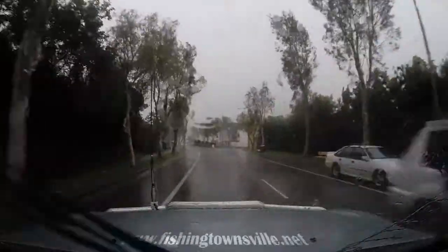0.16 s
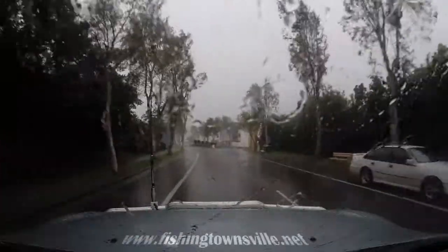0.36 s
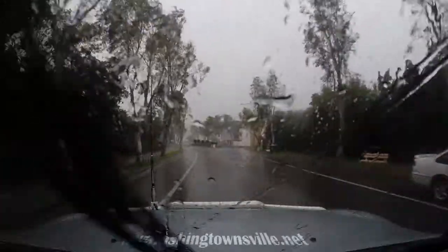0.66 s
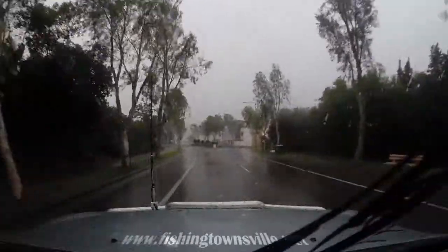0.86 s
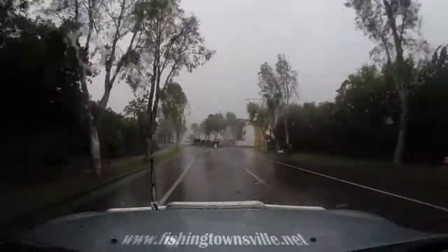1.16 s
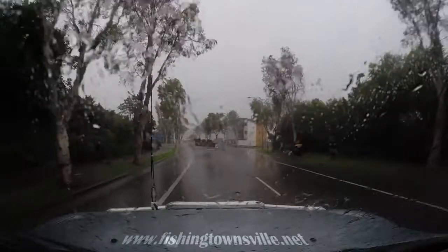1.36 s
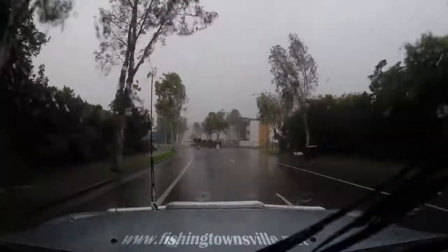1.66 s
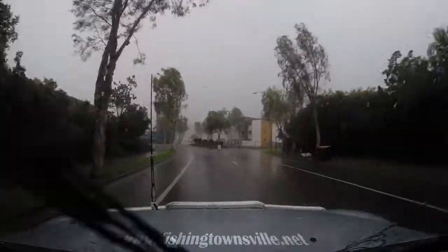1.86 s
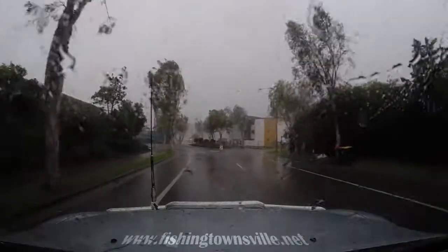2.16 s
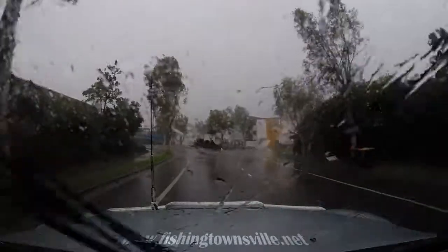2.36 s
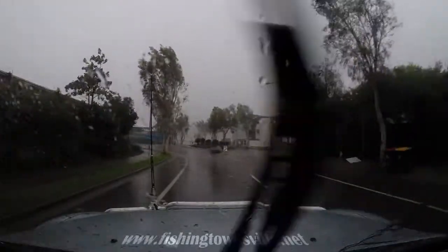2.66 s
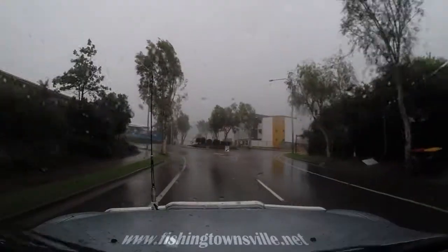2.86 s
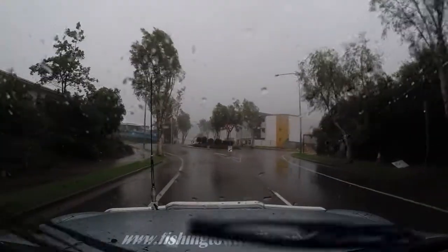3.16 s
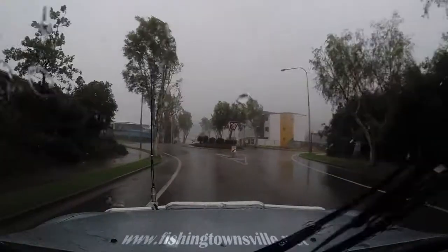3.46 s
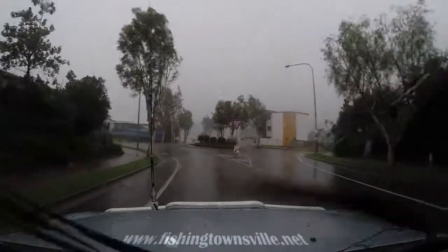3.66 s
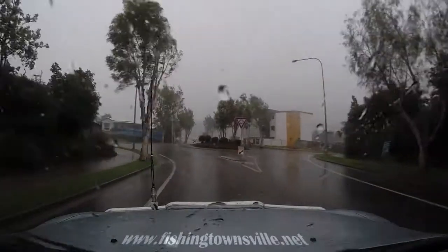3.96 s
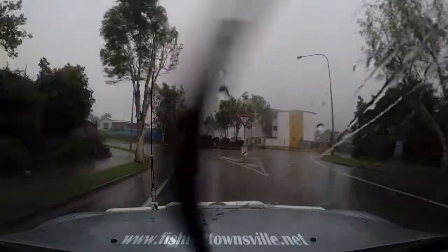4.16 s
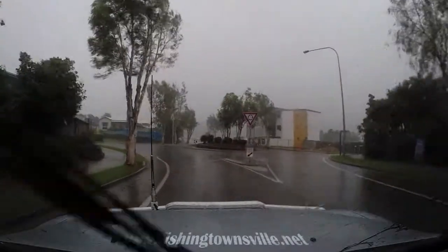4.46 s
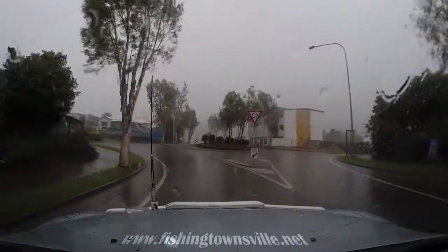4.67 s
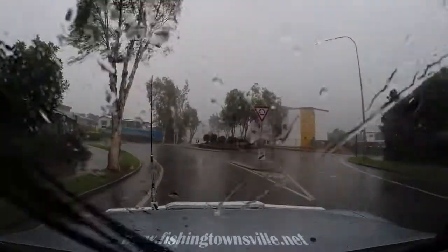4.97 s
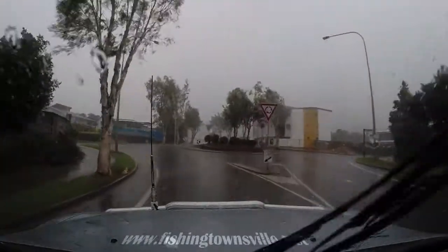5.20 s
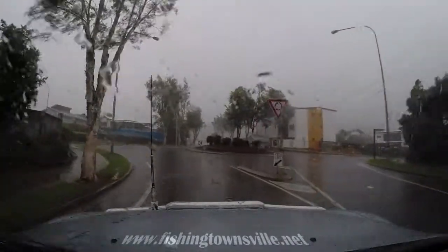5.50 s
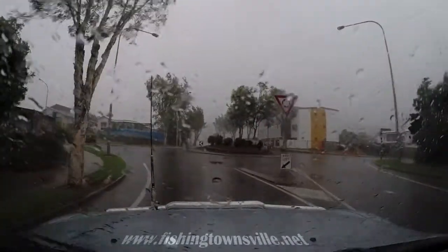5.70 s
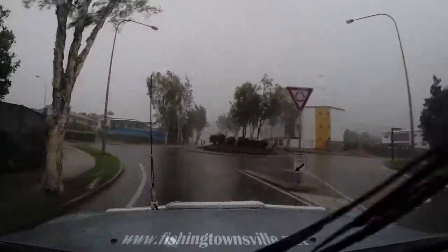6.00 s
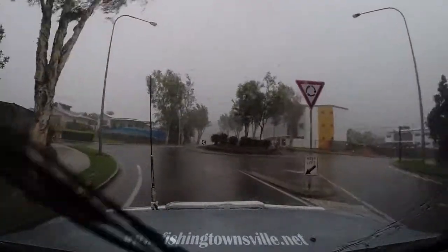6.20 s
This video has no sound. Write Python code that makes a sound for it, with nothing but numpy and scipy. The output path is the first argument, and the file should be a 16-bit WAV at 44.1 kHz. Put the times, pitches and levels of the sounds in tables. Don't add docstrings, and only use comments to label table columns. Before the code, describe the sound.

Inside a car slowing on a flooded street in a storm: heavy rain washing in gusts, drops cracking on glass, wipers thudding over low road rumble.

```python
import sys
import numpy as np
from scipy import signal
from scipy.fft import rfft, irfft
from scipy.io import wavfile
from scipy.ndimage import uniform_filter1d

SR = 44100
rng = np.random.default_rng(int(sys.argv[2]) if len(sys.argv) > 2 else 0)


def convert_level_to_amplitude(level_db):
    exponent = np.asarray(level_db, float) / 20
    return 10 ** exponent


def put_to_file(sound):
    columns = np.atleast_2d(sound).T
    safe = np.clip(columns, -1, 1)
    whole_steps = np.round(safe * 32767)
    wavfile.write(sys.argv[1], SR, whole_steps.astype(np.int16))


N = 279594

# (end of turn t/s, level/dB, boom level/dB, braking/s, settling/s)
WIPER_TURNS = [
    (0.107, -21, -19, 0.046, 0.02),
    (0.978, -21, -26, 0.051, 0.012),
    (1.849, -24.5, -24, 0.075, 0.017),
    (2.72, -20, -30, 0.049, 0.0084),
    (3.591, -24, -15.5, 0.053, 0.01),
    (4.449, -21.5, -19, 0.048, 0.009),
    (5.316, -21.5, -21, 0.036, 0.011),
    (6.177, -23.5, -19, 0.044, 0.015),
]


def rms_one(x):
    return x / np.sqrt(np.mean(x ** 2) + 1e-20)


def in_time(rows):
    s, *columns = np.transpose(rows)
    return [np.interp(np.arange(N) / SR, s, c) for c in columns]


def hump(at_s, length_s):
    return np.exp(-((np.arange(N) / SR - at_s) / length_s) ** 2)


def drift(rate):
    pole = np.exp(-40 * np.pi * rate / SR)
    chance = rng.standard_normal(N // 20 + 4002)
    slow = signal.lfilter([1], [1, -2 * pole, pole * pole], chance)[4000:]
    return np.interp(np.arange(N) / 20, np.arange(len(slow)), rms_one(slow))


def filtered(x, order, hz, kind="low"):
    return signal.sosfilt(signal.butter(order, hz, kind, fs=SR, output="sos"), x)


def smooth_low(x, hz):
    return signal.sosfiltfilt(signal.butter(2, hz, fs=SR, output="sos"), x)


def colour(x, spectrum):
    # (f/Hz, width/Hz, level/dB)
    resonances = [(40, 14, 6), (138, 5.3, -6), (210, 24, 3.5), (287.1, 17.4, 8.5), (428.6, 109, 11),
                  (622, 32, 8), (754, 19, 4), (1264, 43, 3.5)]
    hz = np.maximum(np.fft.rfftfreq(N, 1 / SR), 1)
    corner_hz, corner_db = np.transpose(spectrum)
    db = np.interp(np.log(hz), np.log(corner_hz), corner_db)
    for centre_hz, width_hz, top_db in resonances:
        db = db + top_db / (1 + (2 * (hz - centre_hz) / width_hz) ** 2)
    return irfft(rfft(x) * convert_level_to_amplitude(db), N)


def grains(per_s, spread_db):
    sizes = convert_level_to_amplitude(spread_db * np.minimum(rng.exponential(1, N), 4)) * rng.choice([-1, 1], N)
    return rms_one(sizes * (rng.random(N) < per_s / SR))


def flicker(x, low_hz, count, shared_db, own_db, rate):
    spectrum, hz = rfft(x), np.fft.rfftfreq(N, 1 / SR)
    together = drift(rate)
    octave = np.clip(np.log2(np.maximum(hz, 1) / low_hz), 0, count - 1)
    total = np.zeros(N)
    for k in range(count):
        band = irfft(spectrum * np.clip(1 - abs(octave - k), 0, 1), N)
        total += band * convert_level_to_amplitude(shared_db * together + own_db * drift(rate))
    return rms_one(total)


def place(out, at, sound):
    out[at:at + len(sound)] += sound[:N - at]


def buffeting():
    # (t/s, level/dB, length/s)
    bumps = [(0.14, -14.5, 0.056), (0.283, -22, 0.05), (0.424, -17.5, 0.031), (0.53, -18.5, 0.047),
             (0.655, -17, 0.072), (0.96, -17, 0.024), (1.098, -16.5, 0.037), (1.216, -24, 0.041),
             (1.42, -17.5, 0.094), (1.594, -23.5, 0.1), (1.88, -15, 0.097), (2.215, -21, 0.17),
             (2.611, -15, 0.027), (2.725, -13.5, 0.021), (2.894, -20, 0.16), (3.15, -19, 0.035),
             (3.297, -23, 0.15), (3.462, -21, .04), (3.58, -14, 0.04), (3.766, -20.5, 0.031),
             (4.033, -15, 0.031), (4.17, -23.5, 0.088), (4.46, -17.5, 0.041), (4.694, -24.5, 0.11),
             (4.91, -19, 0.089), (5.31, -14.5, 0.038), (5.534, -23, 0.089), (5.7, -19, 0.024),
             (5.84, -15.5, 0.11), (6.168, -21, 0.14)]
    calm_db = -30
    power = convert_level_to_amplitude(calm_db) ** 2 + sum((convert_level_to_amplitude(db) * hump(s, length)) ** 2 for s, db, length in bumps)
    return 10 * np.log10(power)


def weather():
    # (t/s, wash level/dB)
    rain = [(0.0, -42.5), (0.08, -37), (0.45, -43.5), (0.86, -42), (1.0, -46), (1.28, -37), (1.55, -38.5),
            (1.8, -47), (2.3, -40.5), (2.75, -45), (3.05, -57), (3.52, -44.5), (3.9, -53.5), (4.08, -46.5),
            (4.45, -50.5), (4.95, -40), (5.32, -52), (6.34, -39)]
    # (t/s, change/dB, length/s)
    sheets = [(0.82, 1.5, 0.035), (0.923, -4, 0.027), (1.094, -5, 0.039), (1.194, -5.5, 0.045),
              (1.36, -3.5, 0.046), (1.916, 3.5, 0.075), (2.165, 3, 0.039), (2.23, 2, 0.026),
              (2.412, 2.5, .05), (2.883, 2.5, .03), (3.067, 2.5, 0.013), (3.224, 0, 0.015),
              (3.29, -4, 0.097), (3.666, -3.5, .06), (3.957, -5.5, .04), (3.83, 0, .04), (4.036, 7, 0.018),
              (4.47, -3, .006), (4.508, -5, .006), (4.576, -3, 0.024), (5.31, -3, .012), (5.36, -4, .012),
              (3.19, -3, .02), (0.878, 3, .01), (4.72, 2.5, 0.041), (4.26, 4.5, 0.058), (4.36, -8, 0.027),
              (4.422, -13.5, 0.011), (5.043, -2.5, 0.028), (5.195, 4, 0.063), (5.43, 4.5, .05),
              (5.596, 9, 0.1), (5.533, -3, 0.018), (6.006, -10, 0.047), (6.167, 5.5, 0.049)]
    # (t/s, length/s)
    puddles = [
        (3.556, 0.15),
        (4.04, 0.02),
        (5.32, .04),
    ]
    # (t/s, change/dB, length/s)
    joints = [(.0, 0, .04), (0.354, 2, 0.23), (0.642, -0.5, .06), (0.882, 2.5, 0.043), (1.048, -6, .04),
              (1.396, 1.5, 0.12), (1.68, -5.5, 0.071), (2.08, -1.5, 0.078), (2.22, 1.5, 0.039),
              (2.6, -1, .06), (3.0, -3, .05), (3.14, 5, .05), (3.4, 1.5, 0.065), (3.5, -0.5, 0.031),
              (3.656, 4, 0.036), (3.92, 0, 0.034), (4.3, -1, .07), (4.533, -3.5, 0.039), (4.798, -1, 0.049),
              (4.994, 0, .05), (5.18, -4, .05), (5.44, -2, .05), (5.63, -2.5, 0.054), (5.9, -0.5, .08),
              (6.07, -1, .04), (6.26, -1, .03)]
    steady_db, = in_time(rain)
    rain_db = steady_db + sum(db * hump(s, length) for s, db, length in sheets)
    swing_db = uniform_filter1d(rain_db - rain_db.mean(), size=4000)
    puddle = sum(hump(s, length) for s, length in puddles)

    far_turns = sum(hump(turn[0] + 0.41, 0.081) for turn in WIPER_TURNS)
    low_db = -33 + 0.1 * swing_db + 3.5 * far_turns
    low_db = low_db + sum(db * hump(s, length) for s, db, length in joints)
    high_db = -36.5 + 0.65 * swing_db + 4.5 * puddle
    bright_db = 2.4 - 5.5 * puddle
    return rain_db, bright_db, low_db, high_db


def road(boom_db, low_db, high_db):
    # (f/Hz, level/dB per Hz)
    boom_spectrum = [(7.1, -40), (12, -2), (27, 1.5), (45, 3.5), (88, -6.5), (108, -13.5), (136, -9),
                     (166, -29), (200, -18.5), (260, -49), (440, -120)]
    # (f/Hz, level/dB per Hz)
    panel_spectrum = [(90, -19.5), (150, -5.5), (250, -1.5), (450, -9.5), (800, -6.5), (950, -14.5),
                      (1300, -18.5), (2500, -37), (9000, -120)]
    boom = rms_one(colour(rng.standard_normal(N), boom_spectrum))
    swell = np.sqrt(uniform_filter1d(boom ** 2, size=1800) + 0.11)
    boom = rms_one(boom / swell ** 0.82)
    deep = smooth_low(boom, 62)
    tyres_db = boom_db.mean() + 0.2 * (boom_db - boom_db.mean())
    air = convert_level_to_amplitude(boom_db + 1.0) * deep + convert_level_to_amplitude(tyres_db + 2.5) * (boom - deep)

    drumming = rng.standard_normal(N) + 0.3 * grains(900, spread_db=3.5)
    panels = colour(drumming, panel_spectrum)
    panels = flicker(panels, 150, count=4, shared_db=0.8, own_db=-0.26, rate=18.0)
    low = smooth_low(panels, 520)
    return air + convert_level_to_amplitude(low_db - 0.7) * rms_one(low) + convert_level_to_amplitude(high_db - 0.46) * rms_one(panels - low)


def engine():
    # (t/s, firing f/Hz, second order level/dB)
    slowing = [(0, 29.92, -30), (1, 29.45, -35.5), (1.7, 29.33, -37.5), (2.4, 29, -30), (3, 27.6, -31.5),
               (3.7, 27.55, -33.5), (4.5, 27.5, -31), (5, 26.21, -34), (5.5, 25.58, -35.5),
               (6.34, 24.98, -34)]
    # (multiple of the firing rate, level/dB)
    orders = [(1, -5), (2, 0), (3, -4), (4, -9), (5, -12)]
    hz, second_db = in_time(slowing)
    turn = 2 * np.pi * np.cumsum(hz * (1 + 0.0066 * drift(3.9))) / SR
    hum = np.zeros(N)
    for k, db in orders:
        hum += convert_level_to_amplitude(db + 4.9 * drift(4.5)) * np.sin(k * turn + rng.uniform(0, 5.97))
    return np.sqrt(2) * convert_level_to_amplitude(second_db) * hum


def wipers():
    # (f/Hz, level/dB per Hz)
    thud_spectrum = [(50, -21), (85, -2.5), (110, -21), (141, -3), (170, 1.5), (200, -3.5), (250, -4.5),
                     (430, -9), (600, -13), (800, -15.5), (1100, -35), (2000, -65.5), (9000, -120)]
    # (f/Hz, level/dB)
    linkage = [(84, -2.5), (141, -4), (430, -22)]
    t = np.arange(N) / SR
    judder = colour(rng.standard_normal(N) + 0.76 * grains(400, spread_db=5.0), thud_spectrum)
    judder = judder / np.sqrt(uniform_filter1d(judder ** 2, size=1300))
    judder = judder + sum(convert_level_to_amplitude(db) * np.sin(2 * np.pi * hz * t) for hz, db in linkage)
    push, shape = np.zeros(N), np.zeros(N)
    for s, db, boom_db, braking, settling in WIPER_TURNS:
        after = t - s
        shape += convert_level_to_amplitude(db) * np.exp(np.where(after < 0, -(after / braking) ** 2, -after / settling))
        shape += convert_level_to_amplitude(db - 14.0) * hump(s + 0.04, 0.06)
        air = np.sin(2 * np.pi * 43 * after + rng.uniform(0, 9.7))
        push += convert_level_to_amplitude(boom_db - 18.0) * hump(s + 0.015, 0.026) * air
    return shape * judder + push


def twig():
    # (f/Hz, level/dB, decay/s)
    modes = [(1350, -13, .0015), (1880, -1.5, 0.00062), (2570, -3, 0.0011), (3660, 0, 0.00084),
             (4600, -6, 0.0004), (5780, -15.5, 0.0011), (7870, -22.5, .001), (11200, -39, .001)]
    at_s, peak_db = 3.7441, -15.5
    out, t = np.zeros(N), np.arange(2600) / SR
    rings = [convert_level_to_amplitude(db) * np.sin(2 * np.pi * hz * t) * np.exp(-t / decay) for hz, db, decay in modes]
    tick = sum(rings[::2]) - sum(rings[1::2])
    tick = tick * (1 - np.exp(-t / 0.00014))
    echoes = 0.035 * rng.standard_normal(len(t)) * np.exp(-t / 0.0064)
    echoes[0] = 1
    echoes[round(0.0032 * SR)] = 0.16

    water = rng.standard_normal(len(t)) * (np.exp(-t / 0.0012) + 0.32 * np.exp(-t / 0.0084))
    mist = filtered(water, 3, [6000, 10000], "band")
    spray = filtered(water, 2, [1000, 4500], "band") + 0.15 * mist
    spray = spray * (1 - np.exp(-t / 0.0004))
    hit = signal.fftconvolve(tick, echoes)[:len(t)] + 0.51 * spray
    place(out, round(at_s * SR), convert_level_to_amplitude(peak_db) * hit)
    return out


def thumps():
    # (t/s, peak level/dB, ring f/Hz)
    fat_drops = [(0.047, -17.5, 440), (0.612, -25, 450), (0.685, -14, 443), (1.394, -22, 443),
                 (1.527, -12, 444), (1.683, -16, 651), (1.778, -24, 440), (1.9, -24, 504), (2.17, -27, 757),
                 (2.767, -17, 430), (3.083, -19, 401), (3.15, -23, 428), (3.288, -18, 415),
                 (3.492, -17, 643), (3.57, -16, 430), (3.715, -17, 406), (4.019, -18, 433),
                 (4.437, -6.5, 422), (4.58, -14, 420), (4.682, -20, 476), (4.768, -22, 428),
                 (5.304, -25, 428), (5.449, -10.5, 420), (5.579, -19, 490), (5.617, -16.5, 620),
                 (5.68, -19, 635), (5.78, -18, 412), (6.136, -21, 710), (6.157, -12, 432),
                 (6.239, -12, 436)]
    out, t = np.zeros(N), np.arange(2200) / SR
    envelope = np.exp(-t / 0.007) * (1 - np.exp(-t / 0.0015))
    for s, db, hz in fat_drops:
        ring = np.sin(2 * np.pi * hz * t) + 0.4 * np.sin(2 * np.pi * 0.51 * hz * t)
        place(out, round(s * SR), convert_level_to_amplitude(db - 2.5) * ring * envelope)
    return out


def knocks():
    # (t/s, peak level/dB, ring f/Hz)
    roof_drops = [(0.067, -8, 646), (0.928, -16.5, 1260), (0.973, -2.5, 620), (1.053, -11, 885),
                  (1.454, -5.5, 764), (1.802, -4.5, 650), (1.841, -4.5, 630), (2.349, -6.5, 650),
                  (2.516, -13, 614), (2.568, -10, 651), (2.712, -8, 504), (3.436, -7.5, 626),
                  (3.583, -10, 637), (4.062, -13, 622), (4.303, -13, 650), (4.383, -12, 600),
                  (4.506, -15, 620), (4.831, -8, 640), (4.907, -14, 805), (5.117, -13, 622),
                  (5.371, -9, 614), (5.808, -9, 800), (6.046, -13.5, 750), (6.164, -4.5, 776)]
    out, t = np.zeros(N), np.arange(1500) / SR
    envelope = np.exp(-t / 0.0037) * (1 - np.exp(-t / 0.00079))
    for s, db, hz in roof_drops:
        ring = np.sin(2 * np.pi * hz * t) + 0.25 * np.sin(2 * np.pi * 0.28 * hz * t)
        place(out, round(s * SR), convert_level_to_amplitude(db - 8.5) * ring * envelope)
    return out


def ticks():
    # (t/s, peak level/dB)
    tiny_drops = [(0.0174, -51.5), (0.122, -33.5), (0.4174, -46), (0.4544, -43), (0.5197, -45.5),
                  (1.127, -48), (1.1473, -40), (1.8257, -47.5), (2.0373, -49.5), (2.3394, -43),
                  (2.9427, -55.5), (3.0071, -49.5), (3.9305, -51.5), (3.9714, -48.5), (4.0176, -52),
                  (4.3186, -49), (4.3959, -55.5), (4.515, -56), (4.6094, -52.5), (5.0948, -47),
                  (5.5525, -41), (5.7992, -46.5), (5.8167, -34.5), (5.9292, -45.5), (6.0107, -49),
                  (6.0482, -49)]
    out, t = np.zeros(N), np.arange(300) / SR
    for s, db in tiny_drops:
        spit = rng.standard_normal(len(t)) * np.exp(-t / 0.0011)
        place(out, round((s + 0.0014) * SR), convert_level_to_amplitude(db - 0.6) * spit)
    return filtered(out, 3, [2500, 10000], "band")


def drops():
    # (t/s, peak level/dB, ring f/Hz)
    glass_drops = [(0.076, -24.5, 1930), (0.4633, -23, 2036), (0.8515, -22, 2180), (1.043, -25, 3660),
                   (1.12, -25.5, 2530), (1.147, -23.5, 2020), (1.2351, -24.5, 2070), (1.5006, -23.5, 1830),
                   (1.6806, -36, 2160), (1.9305, -25.5, 2200), (2.364, -21.5, 2330), (2.6214, -28.5, 1880),
                   (2.7121, -22.5, 2370), (3.0565, -31, 2170), (3.2104, -33.5, 2010), (3.5773, -24.5, 2050),
                   (3.9427, -28.5, 2370), (3.9708, -26.5, 2080), (4.482, -28.5, 2430), (4.5167, -28, 2010),
                   (4.715, -22.5, 1870), (4.7816, -31.5, 2030), (4.9038, -25.5, 2390),
                   (5.4888, -29.5, 2013), (5.5533, -25.5, 2360), (5.8072, -20.5, 2120),
                   (5.9783, -21.5, 1990), (6.047, -25, 1860), (6.0787, -25.5, 3370), (6.1643, -25.5, 3140),
                   (0.2745, -25.5, 2010), (0.4219, -30.5, 2210), (0.8724, -26.5, 2240),
                    (1.1279, -28, 2420), (1.7235, -28, 2040), (2.8903, -30.5, 2140), (3.0071, -34.5, 2100),
                    (3.0759, -32.5, 2020), (3.2246, -32, 2030), (3.259, -34.5, 2380), (3.3156, -38.5, 2020),
                    (3.5169, -27, 2120), (3.5428, -24.5, 1990), (3.5572, -29, 2010), (3.635, -30.5, 2240),
                    (3.674, -36.5, 1750), (3.8757, -32, 1700), (3.904, -35, 1960), (4.0305, -27, 2140),
                    (4.3844, -37, 1790), (4.3997, -33.5, 1750), (4.4352, -34, 2270), (4.6186, -30.5, 1960),
                    (5.0747, -31.5, 2130), (5.0953, -29, 2100), (5.1841, -27, 1990), (5.3766, -31, 1730),
                    (5.7992, -30.5, 2150), (6.1294, -24.5, 1700), (6.1964, -27, 2390)]
    fizz_db = -34.5
    out, t = np.zeros(N), np.arange(2600) / SR
    for s, db, hz in glass_drops:
        ring = np.sin(2 * np.pi * hz * t) + 0.47 * np.sin(2 * np.pi * 0.3 * hz * t)
        ring = ring * np.exp(-t / 0.0013)
        splash = rng.standard_normal(len(t)) * (np.exp(-t / 0.0018) + 0.072 * np.exp(-t / 0.011))
        splash = filtered(splash, 2, [1300, 4200], "band")
        fizz = rng.standard_normal(len(t)) * (np.exp(-t / 0.0011) + 0.58 * np.exp(-t / 0.0065))
        fizz = filtered(fizz, 2, [5000, 11500], "band")
        drop = ring + 0.99 * splash + convert_level_to_amplitude(fizz_db) * fizz
        onset = 1 - np.exp(-t / 0.00038)
        place(out, round((s + 0.00074) * SR), convert_level_to_amplitude(db - 2.5) * drop * onset)
    return filtered(out, 2, 9000)


def wash(level_db, bright_db):
    # (f/Hz, level/dB per Hz)
    wash_spectrum = [(700, -16), (950, -16.5), (1300, -6), (1700, -11), (2000, -7.5), (2800, -12),
                     (3800, -11.5), (4400, -14.5), (5000, -21.4), (6500, -29.6), (9000, -39.6),
                     (12500, -50), (15000, -60)]
    patter = grains(1500 * convert_level_to_amplitude(3.3 * drift(25)), spread_db=5.0)
    water = colour(rng.standard_normal(N) + 0.6 * patter, wash_spectrum)
    water = flicker(water, 780, count=4, shared_db=0.96, own_db=0.85, rate=88)
    top = filtered(water, 2, 5500, "high")
    lift = convert_level_to_amplitude(bright_db + 0.12 * (level_db - np.mean(level_db))) - 1
    gusts = uniform_filter1d(convert_level_to_amplitude(level_db + 2.5), size=300)
    return (gusts + convert_level_to_amplitude(-62.5)) * (water + lift * top)


def scene():
    rain_db, bright_db, low_db, high_db = weather()
    body = road(buffeting(), low_db, high_db) + engine() + wipers()
    impacts = twig() + thumps() + knocks() + ticks() + drops()
    return (body + impacts + wash(rain_db, bright_db))[None]


def band_limit(x):
    return signal.sosfilt(signal.butter(12, 15100, fs=SR, output="sos"), x)


def record(dry):
    rounded = 0.77 * np.tanh(dry / 0.73)
    return band_limit(rounded)


dry = scene()
out = record(dry)
put_to_file(out)
```